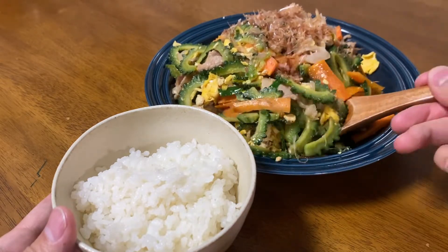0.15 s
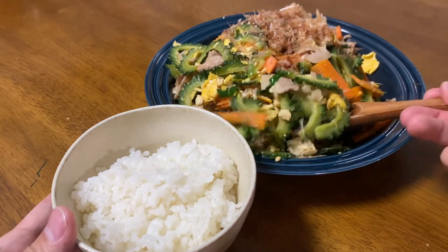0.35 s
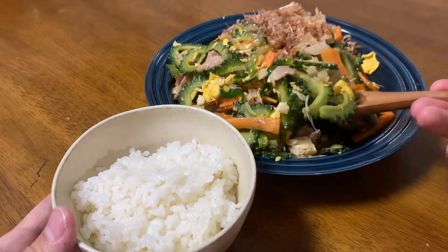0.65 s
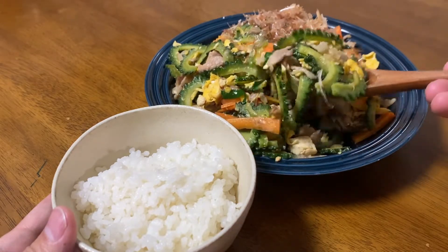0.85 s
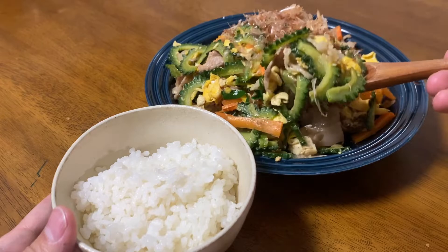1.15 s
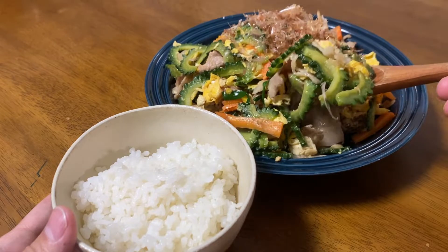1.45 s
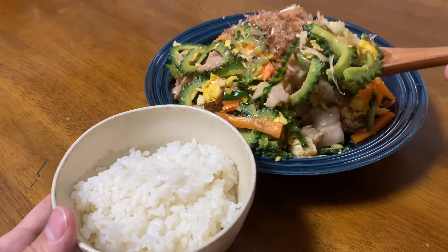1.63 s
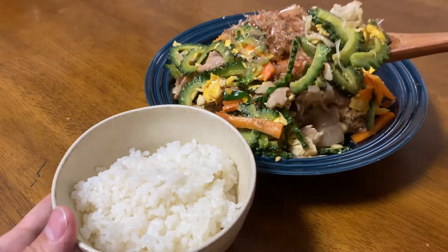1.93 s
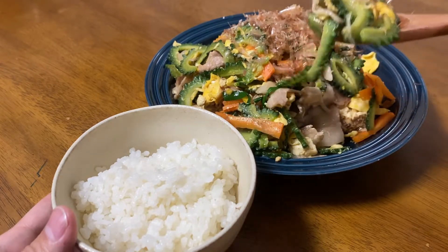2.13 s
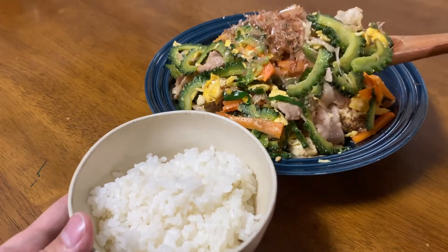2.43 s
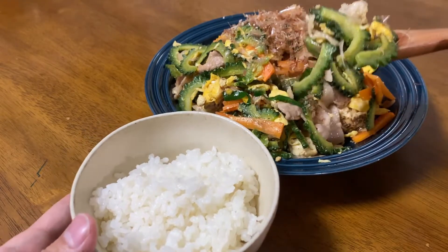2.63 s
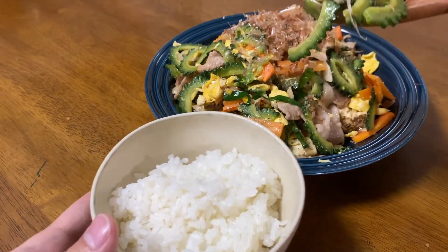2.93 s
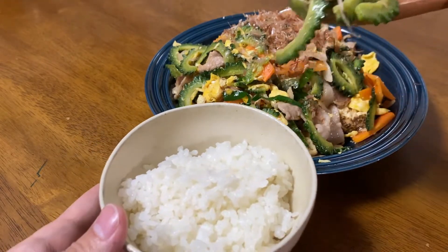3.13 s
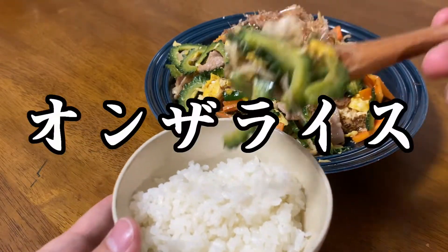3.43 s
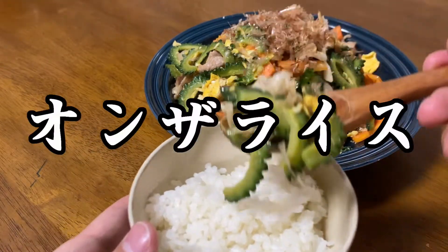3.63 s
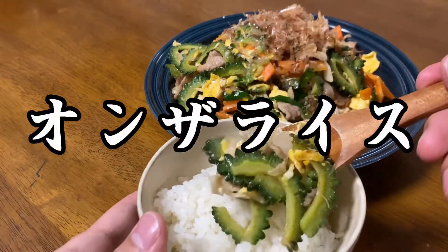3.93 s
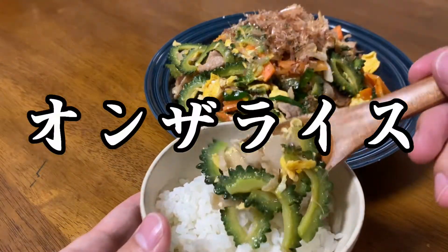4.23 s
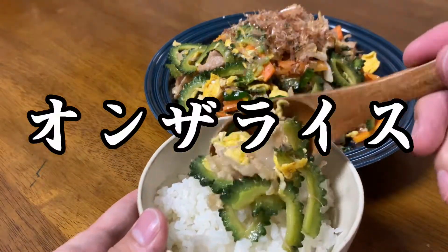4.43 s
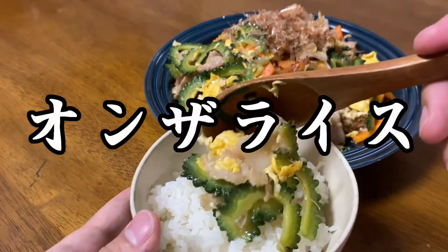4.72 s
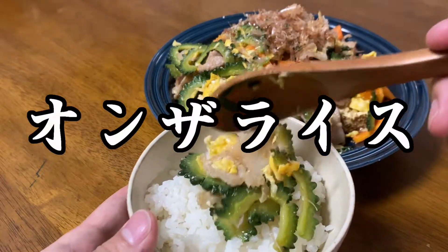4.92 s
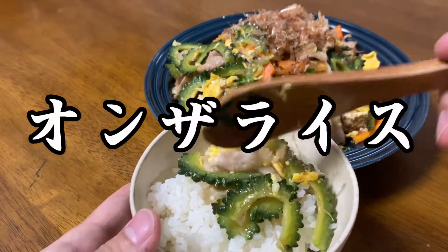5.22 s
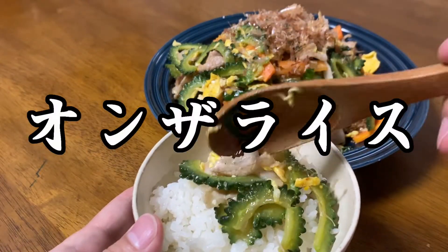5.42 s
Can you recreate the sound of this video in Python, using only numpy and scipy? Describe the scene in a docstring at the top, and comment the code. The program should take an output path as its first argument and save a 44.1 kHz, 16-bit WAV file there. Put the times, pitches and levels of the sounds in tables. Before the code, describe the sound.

A wooden spoon digs into moist stir-fry with faint rustles, sticky smacks and tiny wet ticks, softly bumping the plate against a wooden table. A rice bowl slides closer in two short scraping strokes, the second louder with a brief squeak. It knocks lightly, then is set down with one clear knock. The food settles faintly onto the rice. The microphone is close, in a quiet room.

```python
"""Serving stir-fry onto rice

Close stereo microphone at a wooden table in a quiet room. A wooden spoon lifts moist stir-fry from a
plate and lays it on a bowl of rice: the food rustles and smacks, films of sauce snap in tiny wet ticks,
and the digging bumps the plate against the table. The bowl slides closer in two strokes, its foot
catching on the wood; it knocks once and is set down with a clear knock that rings the table."""
import sys
import numpy as np
from scipy import signal
from scipy.fft import rfft, irfft, next_fast_len
from scipy.io import wavfile
from scipy.ndimage import uniform_filter1d

SR = 44100
rng = np.random.default_rng(int(sys.argv[2]) if len(sys.argv) > 2 else 0)


def transcribe(signal):
    """Save signal, clipped to [-1, 1], as a 16-bit WAV file at the path in sys.argv[1]."""
    frames = np.atleast_2d(signal).T
    limited = np.clip(frames, -1, 1)
    pcm = np.round(limited * 32767).astype(np.int16)
    wavfile.write(sys.argv[1], SR, pcm)


N = 245637
TIME = np.arange(N) / SR

# modes of the laid table and of the bowl's rim: (frequency [Hz], level [dB], t60 [s], left-right [dB])
TABLE_MODES = [(68, -36, 0.35, 0), (80.3, -37.5, 0.15, -4), (119, -26, 0.081, 1), (135, -27.5, 0.16, 0),
               (235.6, -41.5, 0.2, 5.5), (267, -35, 0.133, 8), (325, -26, 0.079, -4),
               (420, -22.5, 0.055, 4), (521, -34, 0.034, 6), (574.6, -33.5, 0.21, -5),
               (609, -43.5, 0.13, 16), (664, -48, 0.19, 7), (827, -40, 0.06, 9.5), (960, -49, 0.056, -0.5),
               (1092, -33.5, 0.12, 3.5), (1207.4, -36, 0.12, -5.5), (1287, -48.5, 0.045, -1),
               (1400, -23.5, 0.00762, 2), (1540, -48, 0.06, 0), (1610, -43.5, 0.11, -1.5),
               (1650, -43, 0.05, 11), (1717, -41.5, 0.095, -6), (1784, -42, 0.035, 1.5),
               (2287, -39, 0.037, 11), (2680, -54.5, 0.045, 10), (3080, -56, 0.04, -1.5),
               (4140, -51, 0.018, 6.5), (4280, -47, 0.025, -1), (5940, -50.5, 0.022, 6),
               (10900, -56, 0.022, -5)]
RIM_MODES = [(2054, -9, 0.08, 3), (2230, -4, 0.03, 8), (3057, 0.5, 0.065, 2), (3830, -9.5, 0.075, 2),
             (4230, -4.5, 0.063, 6.5), (4580, -10.5, 0.057, 2.5), (5420, -19, 0.06, 8)]
# how alike left and right are, close up and for the room: (frequency [Hz], correlation [0-1])
CLOSE_LIKENESS = [(200, 1), (600, 0.42), (1200, 0.41), (2500, 0.54), (6000, 0.38), (9000, 0.94),
                  (13500, 0.626), (16000, 0.64)]
ROOM_LIKENESS = [(60, 0.96), (130, 0.95), (300, 0.72), (640, 0.047), (1400, 0.078), (3100, 0.55),
                 (6000, 0.266), (8500, 0.93), (13500, 0.3), (16000, 0.4)]


def from_db(db):
    """Decibels to gain."""
    return 10 ** (np.asarray(db) / 20)


def rms_one(x):
    """Scale to an rms of 1."""
    return x / np.sqrt(np.mean(x ** 2) + 1e-20)


def at_hz(points, hz):
    """Read a table on a log-frequency axis."""
    known_hz, values = np.transpose(points)
    return np.interp(np.log(hz + 1e-3), np.log(known_hz), values)


def cut(x, hz, kind, order=2):
    """Butterworth filter."""
    sections = signal.butter(order, np.clip(hz, 10, .45 * SR), kind, fs=SR, output="sos")
    return signal.sosfilt(sections, x + 1e-18)


def add(out, s, x):
    """Mix x in from time s."""
    start = max(0, round(s * SR))
    out[..., start:start + x.shape[-1]] += x[..., :N - start]


def swell(s, rise, fall):
    """A smooth hump of height 1 at time s."""
    return np.exp(-((TIME - s) / np.where(TIME < s, rise, fall)) ** 2)


def drift(per_s):
    """A slow random wander; rms 1."""
    return rms_one(cut(rng.standard_normal(N + SR), per_s, "low")[SR:])


def grains(per_s, spread_db):
    """Two trains of random micro-contacts of uneven size; rms 1."""
    sizes = from_db(spread_db * np.minimum(rng.exponential(1, (2, N)), 4)) * rng.standard_normal((2, N))
    return rms_one(sizes * (rng.random((2, N)) < per_s / SR))


def colour(pair, spectrum, likeness=CLOSE_LIKENESS):
    """Two unrelated signals become a stereo sound of the given spectral shape; rms 1."""
    size = next_fast_len(pair.shape[1])
    hz = np.fft.rfftfreq(size, 1 / SR)
    mid, side = rfft(pair, size) * from_db(at_hz(spectrum, hz))
    alike = np.clip(at_hz(likeness, hz), -1, 1)
    stereo = np.sqrt(1 + alike) * mid + np.sqrt(1 - alike) * side * [[1], [-1]]
    return rms_one(irfft(stereo, size)[:, :pair.shape[1]])


def tail(spectrum, t60, treble_t60, likeness=CLOSE_LIKENESS):
    """A dying stereo noise of unit energy, with its own decay above 2.5 kHz."""
    t = TIME[:SR // 2]
    noise = colour(rng.standard_normal((2, len(t))), spectrum, likeness)
    lows = cut(noise, 2500, "low") * from_db(-60 * t / t60)
    highs = cut(noise, 2500, "high") * from_db(-60 * t / treble_t60)
    burst = lows - highs
    return burst / np.sqrt(np.sum(burst ** 2) / 2)


def through(x, response):
    """Pass a sound through a stereo response."""
    return signal.fftconvolve(np.atleast_2d(x), response, axes=1)[:, :N]


def ringing(modes):
    """Stereo response of a body: damped sines of alternating sign."""
    t, sides = TIME[:SR // 2], np.array([[.5], [-.5]])
    return sum((-1) ** k * from_db(db - 60 * t / t60 + pan * sides) * np.sin(2 * np.pi * hz * t)
               for k, (hz, db, t60, pan) in enumerate(modes))


def sustained(slips, modes, window=660):
    """Steady friction holds a resonance at an even strength; rms 1."""
    ring = through(slips, ringing(modes))
    power = uniform_filter1d(np.mean(ring ** 2, axis=0), window)
    return ring / np.sqrt(np.abs(power) + 1e-9)


def room_tone(air_db=-58, whine_db=-86):
    """The low rumble of the room's air and a faint steady whine."""
    # spectra: (frequency [Hz], relative density [dB])
    air_spectrum = [(15, -41), (28, -19), (42, 4), (75, -2.5), (125, -3), (170, -8.5), (260, -13),
                    (330, -15), (450, -22.5), (800, -26), (1500, -32.5), (2300, -40), (3300, -43.5),
                    (12000, -50.5), (16000, -58.5)]
    whine_spectrum = [(1800, -47.5), (2450, -15), (2690, -9.5), (2800, -45), (3000, -49)]
    air = colour(rng.standard_normal((2, N)), air_spectrum, ROOM_LIKENESS)
    whine = colour(rng.standard_normal((2, N)), whine_spectrum, ROOM_LIKENESS)
    return from_db(air_db) * air + from_db(whine_db) * whine


def room_reverb(x, wet_db=-13.5):
    """The small furnished room answers 4 ms behind the direct sound and soaks up the treble."""
    walls = [(60, 0.5), (300, -2.9), (1500, -9.0), (4000, -14)]   # (frequency [Hz], level [dB])
    answer = tail(walls, t60=0.23, treble_t60=0.17, likeness=ROOM_LIKENESS)
    return from_db(wet_db) * through(x, np.pad(answer, ((0, 0), (SR // 250, 0))))


def food_rustle(dig_db=-72.5, lift_s=0.88, release_s=0.11, rise_share=0.24, clump_db=2.6, crackle_db=-14):
    """Tiny wet contacts merge into a clumpy, crackling rustle as the spoon digs and as pieces slip."""
    # food slips on the spoon, then onto the rice: (peak time [s], level [dB], length [s])
    slips = [(0.705, -78, 0.05), (0.8, -70, 0.061), (1.05, -75, 0.053), (1.16, -77, 0.14),
             (1.275, -77.5, 0.17), (1.413, -68, 0.1), (1.59, -74.5, 0.1), (1.88, -73.5, 0.08),
             (2.078, -68.5, 0.059), (3.246, -70.5, 0.14), (3.3, -71.5, 0.018), (3.606, -74.5, 0.069),
             (3.886, -79.5, 0.43), (4.256, -74.5, 0.11), (4.514, -72, 0.087), (4.891, -75, 0.086),
             (5.311, -78.5, 0.079), (5.425, -75, 0.063)]
    # wet rustle and sticky crackle: (frequency [Hz], relative density [dB])
    rustle_spectrum = [(1200, 17), (2500, 8), (4000, 5), (6500, 4), (9000, 2.5), (11000, 5), (15000, -16.5),
                       (16500, -10)]
    crackle_spectrum = [(1500, -51), (4000, 7.5), (7000, -1), (11000, 4.5), (15000, 6.5), (16500, 3)]
    digging = from_db(dig_db) * np.exp(-np.maximum(TIME - lift_s, 0) / release_s)
    slipping = sum(from_db(db) * swell(s, rise_share * length, (1 - rise_share) * length)
                   for s, db, length in slips)
    rustle = colour(grains(per_s=5600, spread_db=-0.5), rustle_spectrum)
    crackle = colour(grains(per_s=460, spread_db=2.0), crackle_spectrum)
    clumps = rms_one(from_db(clump_db * drift(per_s=14)))
    return np.hypot(digging, slipping) * clumps * (rustle + from_db(crackle_db) * crackle)


def food_smacks(rise_s=0.0059):
    """A sticky patch lets go all at once and its crackle dies away."""
    # food coming unstuck: (time [s], level [dB], t60 [s])
    smacks = [(0.099, -63, 0.27), (1.717, -58.5, 0.35), (3.47, -76, 0.98), (4.25, -75, 0.36)]
    # the wet smack: (frequency [Hz], relative density [dB])
    spectrum = [(150, -22), (350, 18.5), (600, 0), (1150, 3), (1900, -2.5), (2400, 1.5), (3300, -2),
                (5000, 1), (7000, -10.5), (11000, -14.5), (16000, -39)]
    level = sum(np.clip((TIME - s) / rise_s + 1, 0, 1) * from_db(db - 60 * np.abs(TIME - s) / t60)
                for s, db, t60 in smacks)
    return level * colour(grains(per_s=9000, spread_db=0.5), spectrum)


def sauce_ticks(log_width=0.095, ring_share=0.51, glide=0.031):
    """Each snapping film rings briefly, rising in pitch as it shrinks, in a little spray of noise."""
    # films of sauce snapping: (time [s], level [dB], pitch [Hz], t60 [s])
    ticks = [(0.010, -49, 9400, 0.0082), (0.077, -55, 14500, 0.0055), (0.106, -51.5, 4950, 0.0091),
             (0.181, -64, 10900, .004), (0.327, -49.5, 8140, 0.0057), (0.335, -52, 7560, 0.013),
             (0.4065, -58, 12100, .005), (0.459, -57, 14900, 0.005), (0.512, -57, 12000, 0.0037),
             (0.6563, -55, 10560, 0.0099), (0.705, -59.5, 5000, 0.011), (0.75, -45, 9400, 0.0078),
             (0.7505, -59, 14500, 0.004), (0.776, -42, 9600, 0.0076), (0.777, -58, 6500, 0.008),
             (0.7882, -48.5, 6340, 0.012), (0.8105, -49, 12800, .005), (0.833, -58, 15000, .012),
             (0.861, -48, 9100, 0.011), (1.1411, -39.5, 10800, 0.0076), (1.141, -42, 14900, 0.0037),
             (1.501, -62, 14500, .003), (4.458, -60.5, 10900, 0.0063), (5.359, -47, 13960, 0.0038)]
    out, t = np.zeros(N), TIME[:1024]
    for s, db, hz, t60 in ticks:
        dying = from_db(-60 * t / t60)
        band_hz = hz * np.exp([-log_width, log_width])
        spray = cut(rng.standard_normal(len(t)) * dying, band_hz, "band", order=1)
        pitch = hz * (1 + glide * (.5 - dying))
        ring = dying * np.sin(2 * np.pi * np.cumsum(pitch) / SR)
        snap = ring_share * ring + (1 - ring_share) * spray / np.abs(spray).max()
        add(out, s, from_db(db) * cut(snap, hz / 2, "high"))
    return out


def plate_thuds(table_db=1.5, direct_db=-31.5, cycles=0.98, back_s=0.02266, back_hz=117):
    """Cushioned by food, a push rocks the plate there and back and reaches only the table's low modes."""
    # soft pushes through the dishes into the table: (time [s], relative level [dB], centre [Hz])
    pushes = [(0.08, -8, 128), (0.162, 0, 135), (0.308, -9, 145), (0.816, -2, 171), (1.037, -6.5, 57.5),
              (1.383, 3.5, 85.5), (1.701, -11.5, 160), (2.089, -13, 119), (2.213, -3, 97), (2.251, -2, 81),
              (2.875, -3, 112), (4.103, -5.5, 142)]
    # the plate rocks back far more after a hard push
    returns = [(s + back_s, 1.3 * db - 11.5, back_hz) for s, db, _ in pushes]
    force, rocking, t = np.zeros(N), np.zeros(N), TIME[:SR // 4]
    for s, db, hz in list(pushes) + returns:
        age = hz * t / cycles
        envelope = np.sqrt(4 * np.e * age) * np.exp(-2 * age)
        swing = from_db(db) * envelope * np.sin(2 * np.pi * hz * t)
        add(rocking, s, swing)
        add(force, s, swing * hz / SR)
    table = through(cut(force, 43, "high"), ringing(TABLE_MODES))
    return from_db(table_db) * table + from_db(direct_db) * cut(rocking, 55, "high")


def bowl_singing(fade_s=0.011, waver=0.022, rim_db=-69, rim_hz=3060, rim_t60=0.12):
    """The foot sticks and slips in step with the bowl's low resonance, drawing a nearly pure tone."""
    # swells of the tone: (peak time [s], rise [s], level [dB], pitch [Hz])
    sings = [(2.637, 0.0049, -53.5, 416), (2.781, 0.014, -58.5, 422), (2.83, 0.0081, -52.5, 430.4),
             (2.994, 0.0084, -40, 405), (3.029, 0.0093, -36, 414), (3.125, 0.017, -51.5, 425)]
    times, _, _, hz = np.transpose(sings)
    pitch = np.interp(TIME, times, hz) * (1 + waver * drift(per_s=52))
    tone = rms_one(np.sin(2 * np.pi * np.cumsum(pitch) / SR))
    level = sum(from_db(db) * swell(s, rise, fade_s) for s, rise, db, _ in sings)
    # the rim joins in, more roughly, near the end of the second stroke
    rim = sustained(rng.standard_normal(N), [(rim_hz, 0, rim_t60, 0)])
    return level * tone + from_db(rim_db) * swell(3.05, rise=0.036, fall=0.036) * rim


def bowl_sliding(grit_db=-48, snag_ring_db=7, rasp_follows=0.55, start_s=0.067, stop_s=0.12):
    """The rough foot ring catches on the wood thousands of times a second and rings the bowl."""
    # the rubbing and its fine grit: (frequency [Hz], relative density [dB])
    rub_spectrum = [(100, -7), (220, -6), (340, -11.5), (540, 7.5), (720, -4), (880, -8.5), (1080, 1),
                    (1280, -10), (1500, -8.5), (1900, -14.5), (2250, -15), (2800, -22.5), (4000, -28.5),
                    (8000, -43.5)]
    grit_spectrum = [(1500, -31), (3000, -4.5), (4400, -5), (5500, -5), (8000, -6), (11000, -3.5),
                     (14500, -17), (16000, -25)]
    # the bowl's low resonances: (frequency [Hz], level [dB], t60 [s], left-right [dB])
    body_modes = [(350.9, 2.5, 0.14, 5.5), (405, -3, 0.18, 1), (444, 1.5, 0.069, -5.5),
                  (573, -9.5, 0.075, -5), (820, -9.5, 0.044, 13), (960, -9, 0.1, 2),
                  (1078, -2, 0.028, -4.5), (1216, -11, 0.14, 3), (1296, -9.5, 0.048, 1),
                  (1430, -21, 0.083, 0)]
    # how hard the foot rubs in each stroke: (time [s], effort [dB])
    first_pull = [(2.221, -72), (2.255, -62.5), (2.325, -58.5), (2.395, -60.5)]
    second_pull = [(2.64, -75.5), (2.71, -65.5), (2.893, -59.5), (2.91, -48.5), (2.94, -49), (3.0, -49.5),
                   (3.056, -56.5), (3.082, -47), (3.11, -59.5), (3.15, -70)]
    # what each stroke draws from that effort: (rubbing [dB], low resonance [dB], rim ring [dB])
    strokes = [(9, -6.5, -44), (-1, 4, -46.5)]
    # the foot snags on rough spots: (time [s], half-length [s], level [dB])
    snags = [(2.739, 0.0097, -82.5), (2.792, 0.012, -99), (2.907, 0.0029, -80), (2.936, 0.009, -75.5),
             (2.985, 0.013, -82), (3.072, 0.0056, -86)]
    catches = grains(per_s=8000, spread_db=-0.4)
    rub = colour(catches, rub_spectrum)
    grit = colour(grains(per_s=3400, spread_db=-2.5), grit_spectrum)
    body = sustained(catches[0], body_modes)
    rim = sustained(catches[1], RIM_MODES)
    snagging = sum(from_db(db) * swell(s, width, width) for s, width, db in snags)
    out = snagging * (grit + from_db(snag_ring_db) * rim)
    for pull, (rub_db, body_db, rim_db) in zip((first_pull, second_pull), strokes):
        s, db = np.transpose(pull)
        effort_db = np.interp(TIME, s, db)
        moving = np.interp(TIME, [s[0] - start_s, s[0], s[-1], s[-1] + stop_s], [0, 1, 1, 0])
        bowl = from_db(rub_db) * rub + from_db(body_db) * body
        rasp = from_db(grit_db) * grit + from_db(rim_db) * rim
        out += moving * (from_db(effort_db) * bowl + from_db(rasp_follows * effort_db) * rasp)
    return out


def dish_knocks(clack_db=9.5, clack_left_db=4.5, clatter_db=-8.5, rim_ring_db=-46.5):
    """A dull blow plus a sharp edge rings the table and the rim; the dish settles with a second touch."""
    # hard contacts: the spoon striking the plate at 1.368 s, the rest the dish against the table: (time [s],
    # level [dB], relative sharpness [dB], relative crack [dB], relative rim ring [dB], pitch the rim favours
    # where it is touched [Hz])
    contacts = [(1.368, -17, -5.5, -5.5, -7, 3060), (2.212, -29, -24, -6, -7, 2230),
                (2.4045, -11, -13, -21, -4.5, 3060), (2.629, -31, -13, -37, -20, 2230),
                (3.2968, -10, -18, -24, -0.5, 3810), (3.315, -13, -37, -19, 11.5, 2280),
                (4.0916, 0.5, 3.5, -23.5, -23, 4250)]
    # the table's dense, quickly dying vibration and the contact's splintery crack:
    # (frequency [Hz], relative density [dB])
    clatter_spectrum = [(100, -7), (200, 3), (300, -9), (500, 18), (850, 12), (1150, 9), (1700, 7.5),
                        (2050, -16), (3300, -10), (4900, -29.5), (8000, -30.5), (11000, -15),
                        (16000, -52.5)]
    crack_spectrum = [(400, 14), (1100, -3.5), (2000, 0.5), (3500, -11), (5500, -21), (8000, -29),
                      (12000, -33), (16000, -44.5)]
    # the far side of the foot lands later, softer and duller: (delay [s], level [dB], sharpness [dB])
    touches = [(0, 0, 0), (0.0094, -6.5, -5.5)]
    force, crack_force, rim_force = np.zeros((3, N))
    click = signal.unit_impulse(2048)
    dull = cut(click, 1350, "low")
    for s, db, sharp_db, crack_db, rim_db, rim_hz in contacts:
        for wait, loss_db, duller_db in touches:
            blow = dull + from_db(sharp_db + duller_db) * (click - dull)
            add(force, s + wait, from_db(db + loss_db) * blow)
        add(crack_force, s, from_db(db + crack_db) * click)
        rim_tap = cut(click, rim_hz * np.exp([-0.072, 0.072]), "band")
        add(rim_force, s, from_db(db + rim_db + rim_ring_db) * rim_tap)
    force = cut(force, 200, "high")
    # the contact itself clacks, left of the microphone, before the table rings
    clack = from_db(clack_db + clack_left_db * np.array([[.5], [-.5]])) * cut(force, (970, 1460), "band")
    clatter = from_db(clatter_db) * tail(clatter_spectrum, t60=0.14, treble_t60=0.045)
    table = through(force, ringing(TABLE_MODES) + clatter)
    crack = through(crack_force, tail(crack_spectrum, t60=0.037, treble_t60=0.047))
    rim = through(rim_force, ringing(RIM_MODES))
    return clack + table + crack + rim


def scene():
    """Dishes and food close to the microphone, with the quiet room behind them."""
    background = room_tone()
    dishes = dish_knocks() + plate_thuds() + bowl_sliding() + bowl_singing()
    food = sauce_ticks() + food_rustle() + food_smacks()
    close = dishes + food
    return background + close + room_reverb(close)


def record(dry, cutoff_hz=16300):
    """The microphone's two ports part in phase in the treble; the top is cut steeply."""
    # the left port lags behind the right: (frequency [Hz], lag [rad])
    port_lag = [(7500, 0), (8700, 2.8), (9400, 3.5), (10900, 6.1), (11800, 6.7), (13100, 9.1), (13800, 9.8),
                (14800, 12.4)]
    size = next_fast_len(N + SR // 10)
    lag = at_hz(port_lag, np.fft.rfftfreq(size, 1 / SR))
    left = irfft(rfft(dry[0], size) * np.exp(-1j * lag), size)[:N]
    lowpass = signal.ellip(10, .1, 70, cutoff_hz, fs=SR, output="sos")
    return signal.sosfilt(lowpass, np.array([left, dry[1]]))


dry = scene()
out = record(dry)
transcribe(out)
```